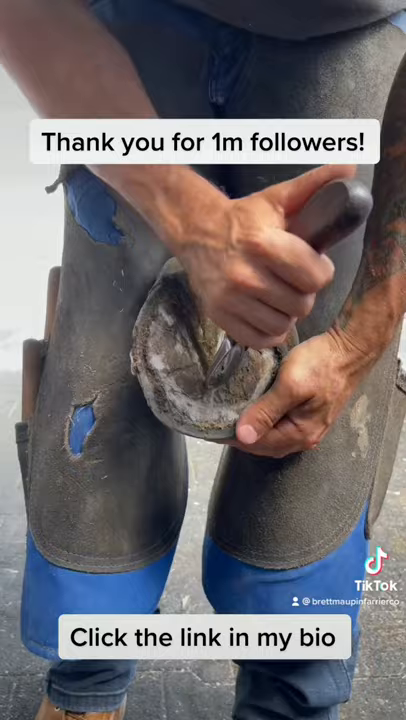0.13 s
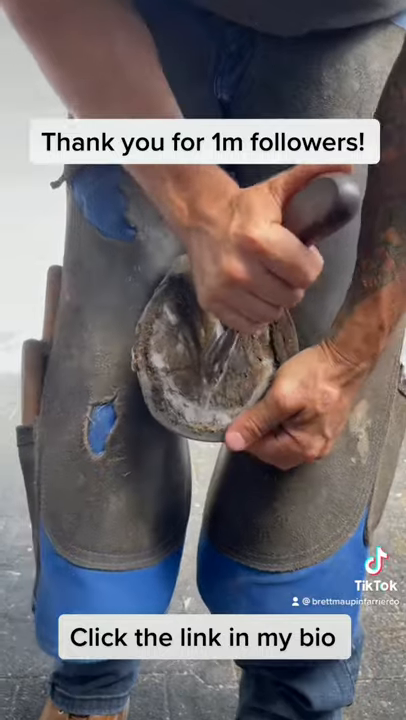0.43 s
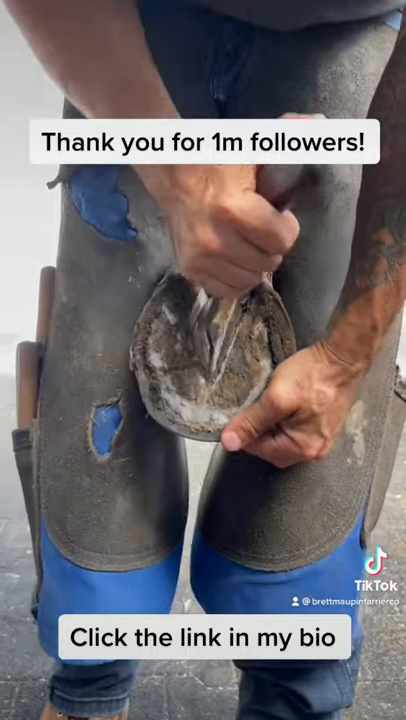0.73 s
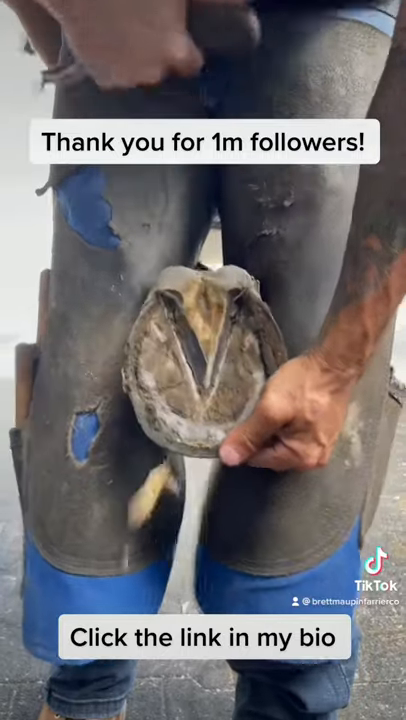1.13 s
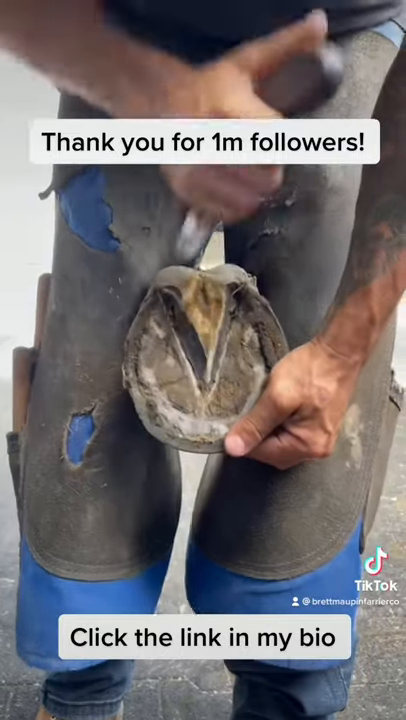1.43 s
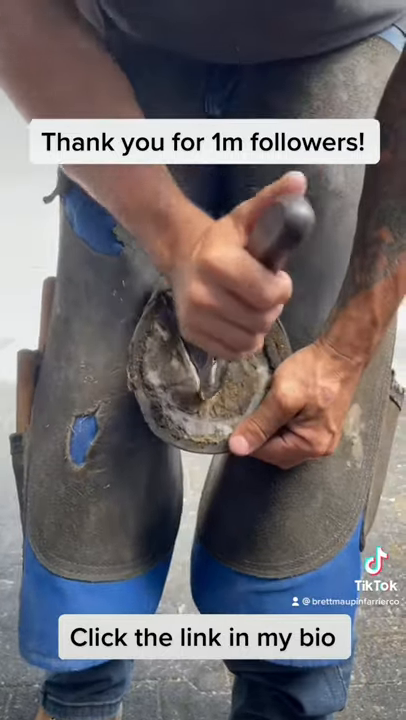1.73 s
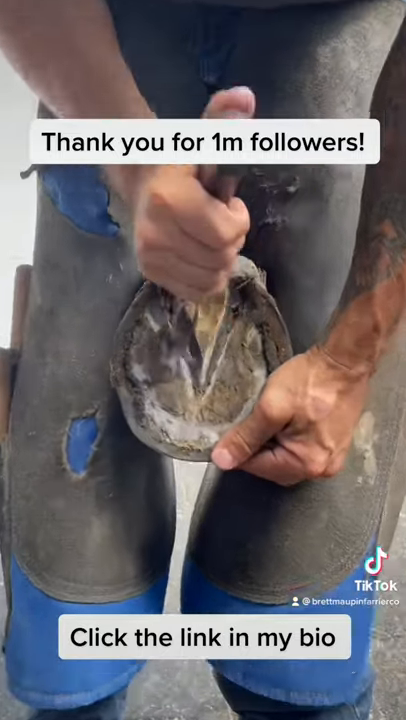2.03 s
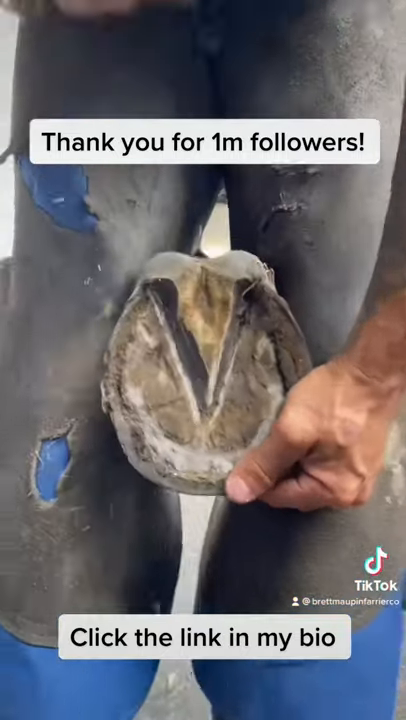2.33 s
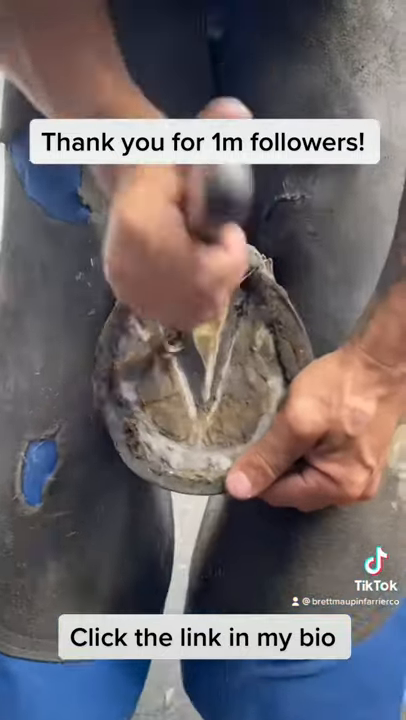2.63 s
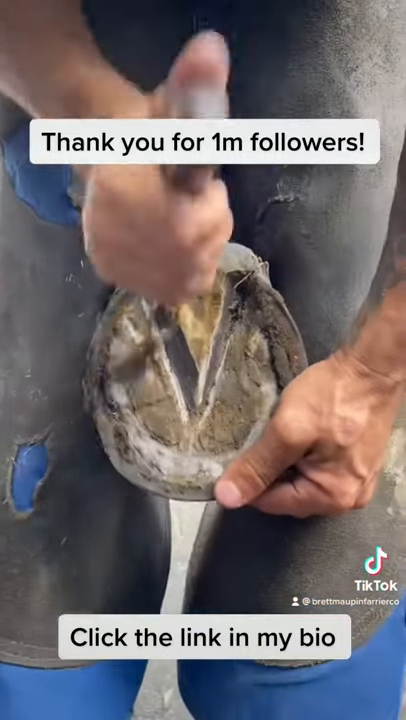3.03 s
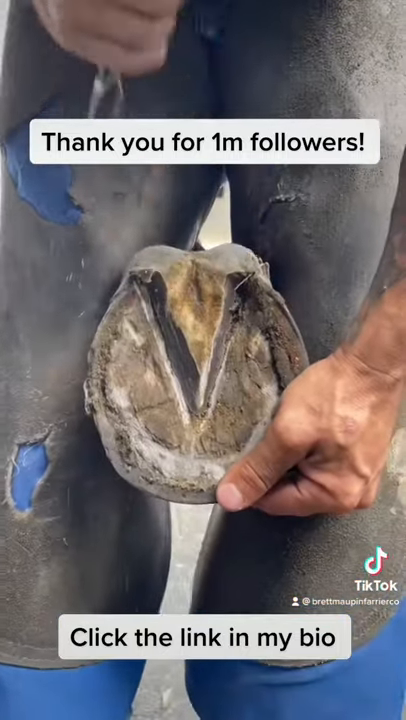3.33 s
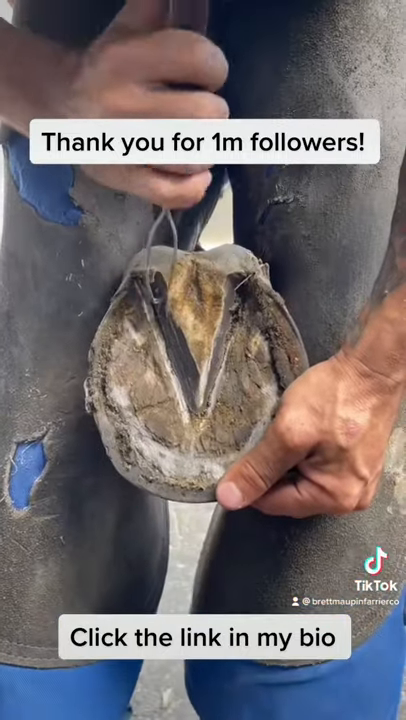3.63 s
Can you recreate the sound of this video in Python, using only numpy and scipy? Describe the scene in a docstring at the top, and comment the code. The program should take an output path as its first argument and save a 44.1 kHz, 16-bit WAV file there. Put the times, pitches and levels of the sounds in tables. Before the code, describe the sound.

A knife scrapes and snaps shavings off a horse's hoof over a low workshop hum.

```python
"""A hoof knife pares a horse's hoof in a workshop, heard by a close pair of microphones.
A low machine hum sounds from the outset. At 0.2 s the blade begins to rasp through dry horn in short
stick-slip strokes; shavings snap off by brittle fracture and patter down, and the arm swishes over the
apron between strokes. From about 1.4 to 2 s the dragging edge squeaks thinly. Just after 3.1 s the steel
leaves the last cut and rings briefly; a few swishes and one faint snap follow over the hum."""
import sys
import numpy as np
from scipy import signal
from scipy.fft import rfft, irfft, next_fast_len
from scipy.io import wavfile

SR = 44100
rng = np.random.default_rng(int(sys.argv[2]) if len(sys.argv) > 2 else 0)


def digitize_waveform(pressure):
    """Quantize a signal to 16-bit integers and store it at the path in sys.argv[1].

    Rows of a 2-D input are taken as channels; values are limited to [-1, 1].
    """
    field = np.atleast_2d(pressure).T
    bounded = np.clip(field, -1, 1)
    quanta = np.round(bounded * 32767).astype(np.int16)
    wavfile.write(sys.argv[1], SR, quanta)


N = 166257
TIME = np.arange(N) / SR

# envelope of the hum's main partial: (time [s], level [dB])
HUM_SWELL = [(0.0, -50.5), (0.73, -40), (0.89, -49.5), (1.58, -42), (1.79, -44.5), (2.03, -42),
             (2.2, -47.5), (2.46, -39.5), (2.51, -64), (2.54, -43), (2.78, -40), (2.87, -63), (3.05, -37.5),
             (3.53, -51.5), (3.57, -43.5), (3.77, -47)]
# weaker partials of the hum: (frequency [Hz], level [dB])
HUM_PARTIALS = [(94.7, -54.5), (189, -58), (284.5, -63.5)]
# spectrum of the workshop air: (frequency [Hz], relative density [dB])
AIR_SPECTRUM = [(20, -3), (32, -36), (43, 7.5), (54, -3.5), (70, 1), (90, 2.5), (120, 4), (150, -3.5),
                (210, -8), (260, -12.5), (380, -11.5), (550, -17), (1000, -21.5), (2000, -27),
                (4000, -33.5), (7500, -38.5), (10500, -34), (11500, -41.5), (12500, -101), (16000, -45)]
# the arm brushes the apron: (centre time [s], half length [s], level [dB])
SWISHES = [(0.158, 0.013, -61), (0.338, 0.1, -63.5), (0.824, 0.017, -53.5), (0.943, 0.068, -48.5),
           (1.06, 0.045, -56), (1.23, 0.039, -51), (1.376, 0.017, -55), (1.453, 0.073, -60),
           (1.766, 0.013, -63), (2.183, 0.043, -55), (2.286, 0.038, -55.5), (2.767, 0.026, -55),
           (3.025, 0.078, -55.5), (3.257, 0.02, -55), (3.348, 0.06, -58), (3.543, 0.037, -56.5),
           (3.76, 0.051, -66)]
# spectrum of cloth friction: (frequency [Hz], relative density [dB])
CLOTH_SPECTRUM = [(500, 7), (2500, -1.5), (4500, 5), (7000, 7), (10000, 12), (11300, 14.5), (12500, -16),
                  (13600, -18), (14500, -55)]
# the edge squeaks: (start [s], length [s], level [dB], first frequency [Hz], last frequency [Hz])
SQUEAKS = [(1.35, 0.16, -66, 12980, 12800), (1.39, .12, -62, 4720, 4680), (1.86, 0.13, -53.5, 9800, 11600),
           (1.97, 0.068, -54, 11700, 10800)]
# lingering modes of hoof and knife: (frequency [Hz], 60 dB decay time [s], gain [dB])
RING_MODES = [(1080, 0.13, -21.5), (1167, 0.074, -17.5), (1815, 0.1, -9), (2096, .06, -9.5),
              (2340, 0.069, -12)]
# dull knocks of the hoof and of falling shavings: (centre time [s], level [dB], frequency [Hz])
KNOCKS = [(.7815, -35.5, 530), (1.0163, -26.5, 1290), (1.0188, -33, 595), (1.047, -41, 676),
          (1.072, -42, 850), (1.0824, -33, 454), (1.363, -41, 342), (1.370, -42, 384), (1.736, -44, 260),
          (2.2439, -28, 1070), (2.2468, -27.5, 710), (2.2518, -37, 336), (2.278, -44, 610),
          (2.302, -41, 537), (2.631, -28, 1440), (2.6337, -26, 405), (2.6877, -41, 900), (2.763, -37, 560),
          (2.8197, -38.5, 980), (2.822, -39.5, 530), (3.058, -36, 394), (3.1913, -33.5, 940),
          (3.1932, -34.5, 520), (3.215, -43, 670)]
# resonances of horn (broad) and blade (narrow): (frequency [Hz], bandwidth [Hz], gain [dB])
HORN_MODES = [(730, 330, 0), (1185, 210, -5.5), (1640, 220, -9), (2060, 460, -4), (2440, 280, -1.5),
              (2850, 140, -13.5), (3330, 81, -9), (3780, 240, -5), (4250, 260, -8.5), (5330, 890, -33),
              (6350, 100, -15), (7030, 170, -6.5), (9885, 117, 5), (10580, 140, -1), (10830, 170, -12),
              (11240, 60, -6), (12500, 480, -23.5)]
# overall colour of strokes and snaps: (frequency [Hz], gain [dB])
RASP_COLOUR = [(100, 28), (350, -0.5), (1500, -1), (4000, 1), (8500, 4.5), (11500, 0), (13000, -8.5),
               (14000, -22), (15500, -36)]
# the edge bites or a shaving breaks off: (start [s], decay [s], body gain [dB], middle gain [dB],
# upper gain [dB], treble gain [dB], contact resonance [Hz], its boost [dB])
SNAPS = [(0.201, 0.0032, -56, -50, -54, -47, 2450, 16), (.416, 0.0036, -54, -55, -53, -47.5, 10900, 14.5),
         (.7718, 0.0069, -37.5, -34, -29, -35, 2240, 11.5),
         (0.9941, 0.0016, -36, -35, -31.5, -25.5, 5580, 19),
         (1.0154, 0.0032, -30, -32, -35, -29.5, 2290, 0), (1.069, 0.0026, -54, -50.5, -48, -58, 2200, 14.5),
         (1.868, 0.0032, -51, -44.5, -53, -56, 3480, 6), (1.5432, 0.0061, -43, -47, -45, -44.5, 1910, 10),
         (1.3598, 0.0015, -53, -55, -61, -52, 2100, 9), (1.652, 0.0022, -65, -53, -55.5, -50, 7500, 3),
         (1.734, 0.0036, -47, -57, -57.5, -60, 4200, 15), (2.031, 0.0035, -42, -40, -52, -50, 3900, 0),
         (2.061, 0.0037, -42, -37, -43, -41, 4000, 10.5), (2.074, 0.0056, -44, -45, -43, -42, 2400, 2),
         (2.085, 0.0033, -43, -37.5, -41, -37, 3830, 7.5), (2.111, 0.0039, -46, -45, -39, -50, 6700, 5),
         (2.2426, 0.0038, -42, -36.5, -33, -31.5, 5600, 16.5),
         (2.6290, 0.0012, -29, -28.5, -27.5, -30.5, 5820, 16), (2.678, 0.0038, -44, -41, -40, -37, 7200, 5),
         (2.6863, 0.001, -23, -28, -45, -44, 2430, 7), (2.701, 0.0029, -36, -47, -40, -35, 6460, 14),
         (3.054, 0.0028, -43, -37.5, -43, -43, 5800, 14), (2.7448, 0.0043, -43, -33, -36, -33, 4070, 8.5),
         (3.085, 0.005, -43, -39, -45, -36, 2650, 10), (3.101, 0.0078, -39.5, -37, -45, -40, 2620, 14.5),
         (3.108, 0.0038, -41, -39, -36, -39, 2620, 13), (3.1413, 0.0065, -35, -34, -30.5, -26, 4020, 8.5),
         (3.702, 0.0027, -63, -68, -52, -46, 10900, 11.5)]
# the blade cuts: (start [s], rise [s], hold [s], 20 dB release time [s], relative level [dB],
# body gain [dB], treble gain [dB], contact resonance [Hz], its boost [dB])
STROKES = [(0.187, 0.011, 0.017, 0.072, -56, 3, 2, 2820, 11),
           (0.256, 0.0038, 0.042, 0.18, -56.5, -15, 1.5, 2660, 6.5),
           (0.564, 0.052, 0.016, 0.087, -52, 3, 0, 2380, -1),
           (0.667, 0.04, .016, 0.096, -48, 2, 1.5, 2300, -3),
           (0.745, 0.023, 0.006, 0.03, -38, -2, 0, 2230, 4.5),
           (0.993, 0.0011, 0.0044, 0.025, -43.5, -4, 13, 5800, 5),
           (1.002, 0.0078, 0.0053, 0.026, -36.5, 0, -1, 2350, 3.5),
           (1.826, 0.012, 0.012, .02, -54, -14, -2, 3850, -1),
           (1.852, 0.023, 0.06, 0.11, -48.5, -2, 0.5, 3460, 7),
           (1.953, 0.0073, 0.0068, 0.14, -46.5, 1, 2, 3800, 6),
           (2.016, 0.018, 0.059, 0.053, -42, -0.5, 2, 3900, 9),
           (2.12, 0.041, 0.053, .03, -56.5, 1, -17, 5500, 5),
           (2.208, 0.032, 0.01, 0.014, -37.5, -5.5, -2.5, 5700, 4),
           (2.658, .02, 0.023, .016, -38, 1.5, -1, 3660, 7), (2.704, .006, 0.022, 0.03, -49, 1, 6, 2620, 5),
           (2.735, 0.0082, 0.0031, 0.019, -35, -0.5, -0.5, 10270, 15),
           (3.05, 0.0033, 0.0025, 0.026, -42, 7.5, -6, 2800, 6.5),
           (3.078, 0.0071, 0.022, 0.018, -39, 1, 3, 3830, 9),
           (3.111, 0.0057, 0.033, 0.033, -46, 0.5, 4, 2700, 10)]
# phase that sets the mix of the two capsules: (frequency [Hz], phase [rad])
STEREO_PHASE = [(20, .005), (110, .007), (180, .07), (300, .33), (700, .42), (1200, .33), (1800, .27),
                (2500, .68), (3300, .68), (4000, .9), (4500, 1.6), (4860, 3.14), (5200, 5.2), (5800, 6.25),
                (6250, 6.45), (7000, 7.5), (8000, 8.4), (8500, 9.15), (9300, 9.5), (10000, 10.15),
                (11000, 11.1), (12000, 12.1), (13500, 12.4), (16000, 11.5)]

NEAR_CORRELATION, AIR_CORRELATION = 0.83, 0.21  # between the two capsules


def from_db(db):
    """Convert decibels to an amplitude ratio."""
    return 10 ** (np.asarray(db) / 20)


def unit_rms(x):
    """Normalise to unit mean power."""
    return x / np.sqrt(np.mean(x ** 2) + 1e-20)


def at_hz(points, hz):
    """Interpolate a table on a logarithmic frequency axis."""
    f, value = np.transpose(points)
    return np.interp(np.log(hz + 1e-6), np.log(f), value)


def colour(x, points):
    """Zero-phase filtering by a curve of (frequency [Hz], gain [dB])."""
    size = next_fast_len(x.shape[-1] + 512)
    gain = from_db(at_hz(points, np.fft.rfftfreq(size, 1 / SR)))
    return irfft(rfft(x, size) * gain, size)[..., :x.shape[-1]]


def resonance(x, hz, width_hz):
    """A damped resonator: a two-pole band-pass with unit peak gain."""
    r = np.exp(-np.pi * width_hz / SR)
    gain = (1 - r * r) / 2
    return signal.lfilter([gain, 0, -gain], [1, -2 * r * np.cos(2 * np.pi * hz / SR), r * r], x)


def drift(per_s, size=N):
    """Random modulation: straight lines between Gaussian values of unit variance."""
    at = np.arange(size) * per_s / SR
    return np.interp(at, np.arange(2048), rng.standard_normal(2048))


def correlate(two, correlation=NEAR_CORRELATION):
    """Partial coherence: mix two independent signals to a given correlation."""
    return np.array([two[0], correlation * two[0] + np.sqrt(1 - correlation ** 2) * two[1]])


def add(out, start, x):
    """Superpose a sound at a start time in seconds."""
    i = int(start * SR)
    out[:, i:i + x.shape[-1]] += x[..., :N - i]


def machine_hum(main_hz=71.5, waver_db=1.8, waver_rad=.25):
    """Amplitude and phase modulation make the low partials of a machine waver."""
    def partial(hz, db):
        phase = 2 * np.pi * hz * TIME + waver_rad * drift(10) + rng.uniform(0, 2 * np.pi)
        return np.sqrt(2) * from_db(db) * np.sin(phase)
    main = partial(main_hz, np.interp(TIME, *np.transpose(HUM_SWELL)))
    return main + sum(partial(hz, db + waver_db * drift(6.71)) for hz, db in HUM_PARTIALS)


def workshop_air(level_db=-46):
    """Ambient noise: soft, strongest at low frequencies and only weakly coherent between the capsules."""
    noise = correlate(rng.standard_normal((2, N)), AIR_CORRELATION)
    return from_db(level_db) * unit_rms(colour(noise, AIR_SPECTRUM))


def room(x, t60_s=0.3, gain_db=-11.5, lowpass_hz=4900):
    """Reverberation: convolution with a dull, diffuse tail that decays exponentially."""
    t = TIME[:SR // 2]
    tail = rng.standard_normal((2, len(t))) * from_db(-60 * t / t60_s) * np.minimum(t / 0.0011, 1)
    tail = tail / np.sqrt(np.sum(tail[0] ** 2))
    tail = signal.sosfilt(signal.butter(1, lowpass_hz, fs=SR, output="sos"), tail)
    return from_db(gain_db) * signal.fftconvolve(x, tail, axes=1)[:, :N]


def grains(size, per_s=6000, spread_db=1):
    """Shot noise: dense, uneven impulses stand for tiny breaks in horn or the friction of cloth."""
    impulses = rng.random((2, size)) < per_s / SR
    strength = from_db(spread_db * np.minimum(rng.exponential(1, (2, size)), 4))
    polarity = rng.choice([-1, 1], (2, size))
    return correlate(unit_rms(impulses * strength * polarity))


def apron_swishes(flutter_db=2.0):
    """Friction noise of cloth swells and fades with each arm movement; overlaps add in power."""
    power = sum(from_db(db) ** 2 * np.exp(-((TIME - centre) / half) ** 2) for centre, half, db in SWISHES)
    friction = unit_rms(colour(grains(N), CLOTH_SPECTRUM))
    flutter = from_db(flutter_db * drift(45) + drift(270))
    return friction * np.sqrt(power) * flutter


def edge_squeaks(roughness_per_s=380):
    """Friction excites a rough whistle: narrow-band noise that swells, glides and fades."""
    out, t = np.zeros((2, N)), TIME[:SR // 4]
    for start, length, db, first_hz, last_hz in SQUEAKS:
        progress = np.minimum(t / length, 1)
        phase = 2 * np.pi * np.cumsum(first_hz + (last_hz - first_hz) * progress) / SR
        whistle = drift(roughness_per_s, len(t)) * np.sin(phase)
        whistle += drift(roughness_per_s, len(t)) * np.cos(phase)
        add(out, start, from_db(db) * whistle * np.sin(np.pi * progress))
    return out


def blade_ring(start_s=3.145, hz=5216, level_db=-44.5, t60_s=.2, waver_rad=.3):
    """Damped free vibration: the steel rings unsteadily as it leaves the last cut."""
    t = np.maximum(TIME - start_s, 0)
    phase = 2 * np.pi * hz * t + waver_rad * drift(140)
    return np.sin(phase) * (t > 0) * from_db(level_db - 60 * t / t60_s)


def after_ring(x):
    """Modal decay: every cut and knock leaves a few modes of hoof and knife ringing faintly."""
    return sum(from_db(db) * resonance(x, hz, np.log(1000) / (np.pi * t60)) for hz, t60, db in RING_MODES)


def knocks(half_length_cycles=0.97, puff_decay_s=.006, puff_db=-14):
    """Soft impacts of hoof and shavings: each is a brief wave packet of falling pitch and a dull puff."""
    out, t = np.zeros((2, N)), TIME[:SR // 10]
    lead_s, stretch = .02, 0.37  # the period grows by a factor exp(stretch) per cycle
    for centre, db, hz in KNOCKS:
        cycles = np.log(np.maximum(1 + stretch * hz * (t - lead_s), 1e-6)) / stretch
        packet = np.cos(2 * np.pi * cycles) * np.exp(-(cycles / half_length_cycles) ** 2)
        band = signal.butter(2, [hz / 2, hz * 2], "band", fs=SR, output="sos")
        noise = correlate(rng.standard_normal((2, len(t))))
        puff = unit_rms(signal.sosfilt(band, noise)) * np.exp(-t / puff_decay_s)
        add(out, centre - lead_s, from_db(db) * packet)
        add(out, centre, from_db(db + puff_db) * puff)
    return out


def horn_response(x, direct_gain=0.42):
    """Forced vibration: the modes of horn and blade respond in parallel with the direct crackle."""
    modes = sum(from_db(db) * resonance(x, hz, width) for hz, width, db in HORN_MODES)
    return colour(direct_gain * x + modes, RASP_COLOUR)


def contact(x, hz, boost_db):
    """Contact resonance: where the edge meets the horn, one band is raised (or lowered, if negative)."""
    return x + (from_db(boost_db) - 1) * resonance(x, hz, width_hz=260)


def horn_snaps(attack_share=0.35, squareness=2.6, gain=1.53):
    """Brittle fracture: a crack gathers and runs through the horn in a few milliseconds."""
    out, t = np.zeros((2, N)), TIME[:SR // 20]
    for start, decay, body_db, middle_db, upper_db, treble_db, hz, boost_db in SNAPS:
        envelope = np.minimum(t / (attack_share * decay), 1) * np.exp(-(t / decay) ** squareness)
        crack = correlate(rng.standard_normal((2, len(t)))) * envelope
        spectrum = [(1300, body_db), (2300, middle_db), (4200, middle_db),
                    (6000, upper_db), (7200, upper_db), (10500, treble_db)]
        add(out, start, gain * colour(contact(crack, hz, boost_db), spectrum))
    return out


def stick_slip(size, per_s=380, decay_s=.0011, spread_db=3.5, floor=.4):
    """Stick-slip envelope: the edge catches and jumps unevenly; each jump frees a quickly dying burst."""
    at = np.cumsum(rng.uniform(.25, 1.75, 256)) * SR / per_s
    strength = from_db(spread_db * rng.uniform(-1.5, 1.5, 256))
    jumps = np.bincount(at[at < size].astype(int), strength[at < size], size)
    bursts = signal.lfilter([1], [1, -np.exp(-1 / (decay_s * SR))], jumps)
    return unit_rms(floor + bursts)


def knife_strokes(pressure_curve=1.7):
    """Stick-slip cutting: tiny fractures rasp in proportion to pressure, which rises, holds and falls."""
    out, t = np.zeros((2, N)), TIME[:SR // 3]
    for start, rise, hold, release, db, body_db, treble_db, hz, boost_db in STROKES:
        dig_in = np.clip(t / rise, 0, 1) ** pressure_curve  # slowly at first
        pressure = dig_in * from_db(-20 * np.maximum(t - rise - hold, 0) / release)
        rasp = grains(len(t)) * stick_slip(len(t)) * pressure * from_db(db)
        rasp = contact(rasp, hz=2710, boost_db=3)  # the woody note of the sole, shared by all strokes
        spectrum = [(1000, body_db), (2200, 0), (6500, 0), (10500, treble_db)]
        add(out, start, colour(contact(rasp, hz, boost_db), spectrum))
    return out


def scene():
    """Superposition of the close knife work, its reverberation, the apron and the workshop behind."""
    work = from_db(4) * horn_response(knife_strokes() + horn_snaps()) + knocks()
    work = work + after_ring(work) + blade_ring() + edge_squeaks()
    return work + room(work) + apron_swishes() + machine_hum() + workshop_air()


def record(dry, stopband_hz=16485):
    """Mid-side mixing of two capsules by a phase that turns with frequency; a low-pass cuts the top."""
    size = next_fast_len(N + 2048)
    half_phase = at_hz(STEREO_PHASE, np.fft.rfftfreq(size, 1 / SR)) / 2
    first, second = rfft(dry, size)
    mid, side = first * np.cos(half_phase), 1j * second * np.sin(half_phase)
    stereo = irfft(np.array([mid + side, mid - side]), size)[:, :N]
    return signal.sosfilt(signal.cheby2(12, 70, stopband_hz, fs=SR, output="sos"), stereo)


dry = scene()
out = record(dry)
digitize_waveform(out)
```